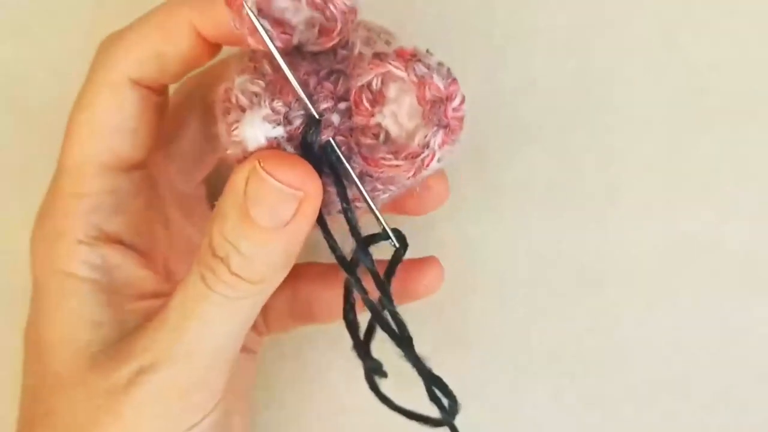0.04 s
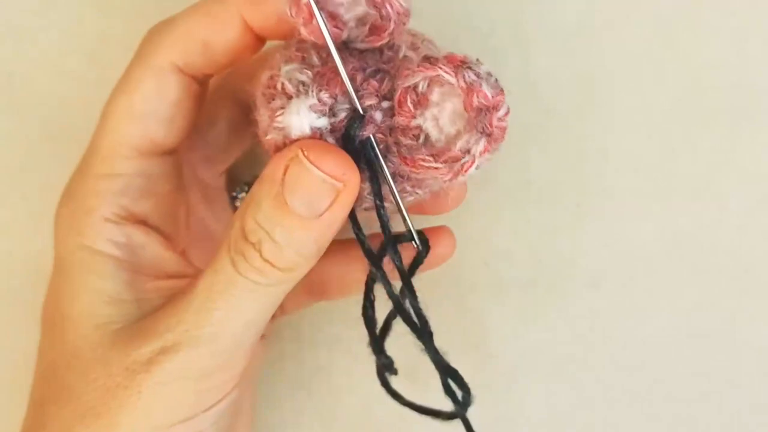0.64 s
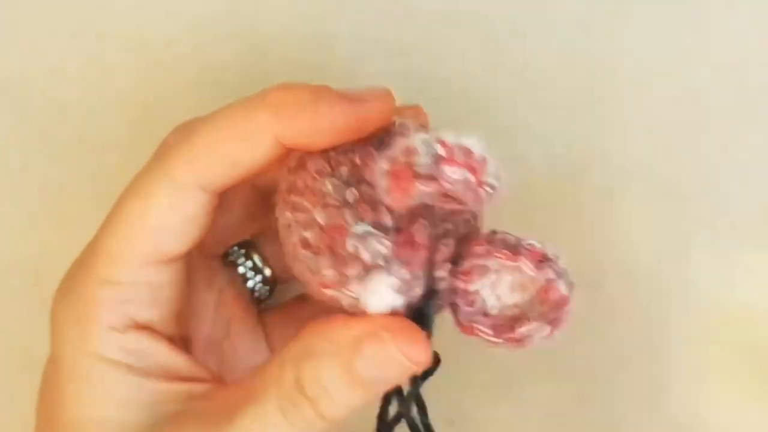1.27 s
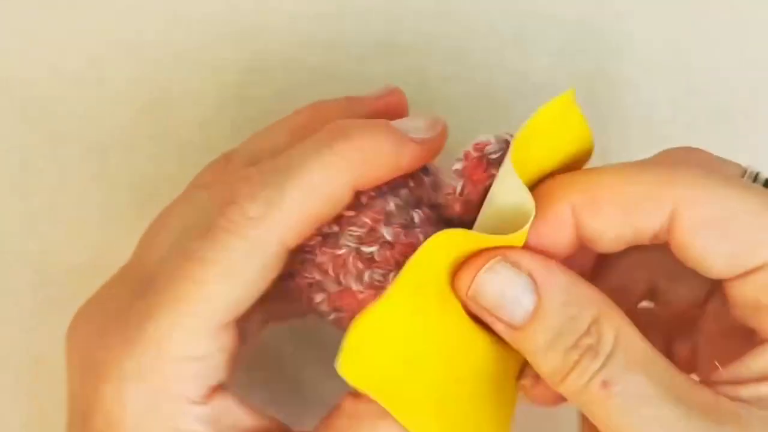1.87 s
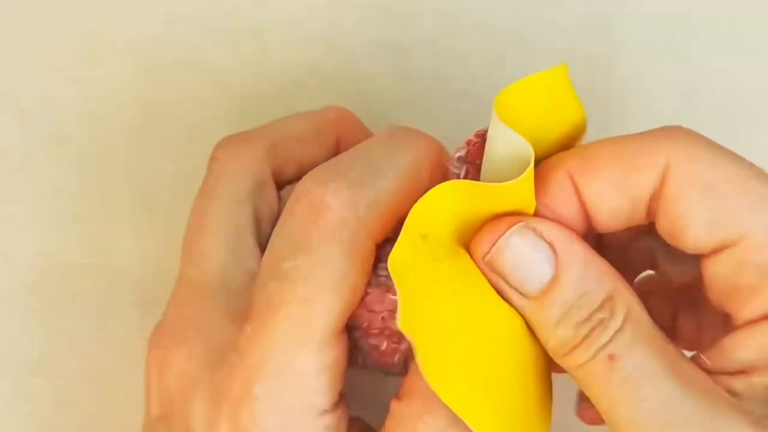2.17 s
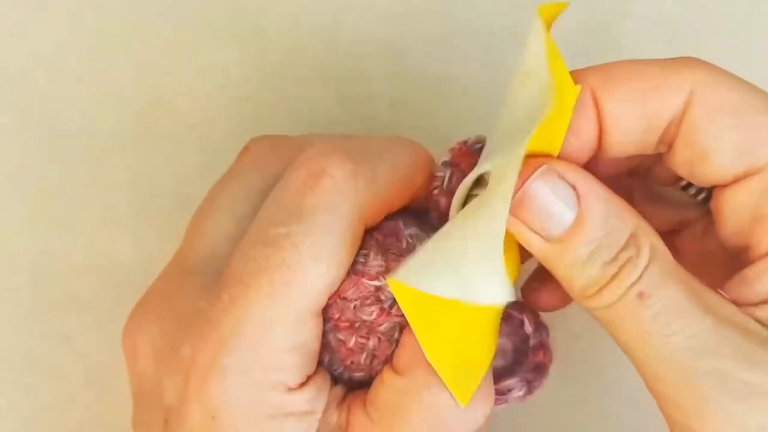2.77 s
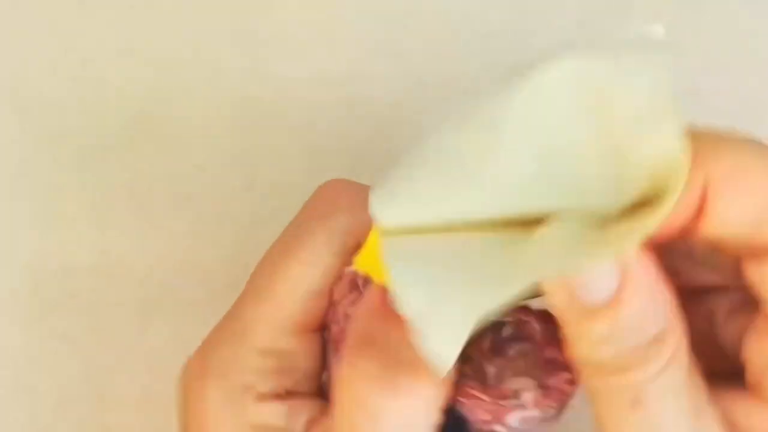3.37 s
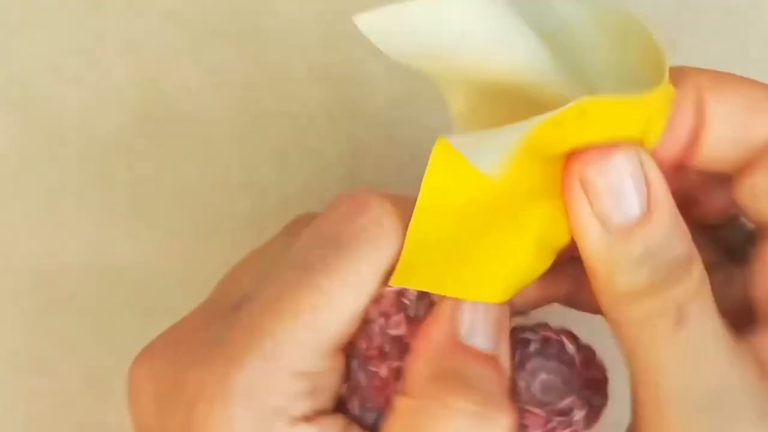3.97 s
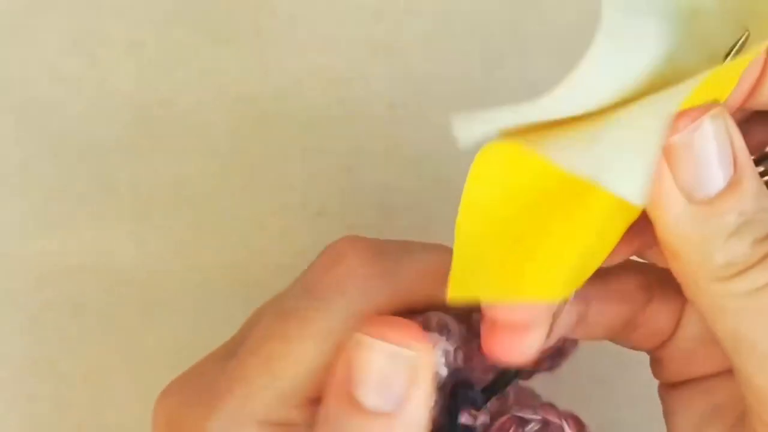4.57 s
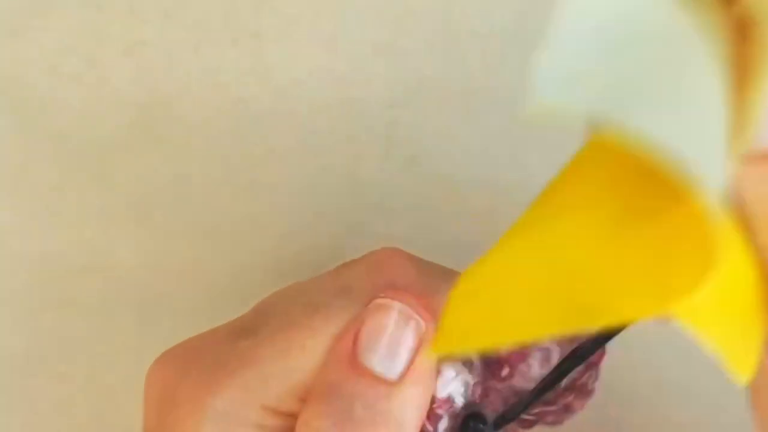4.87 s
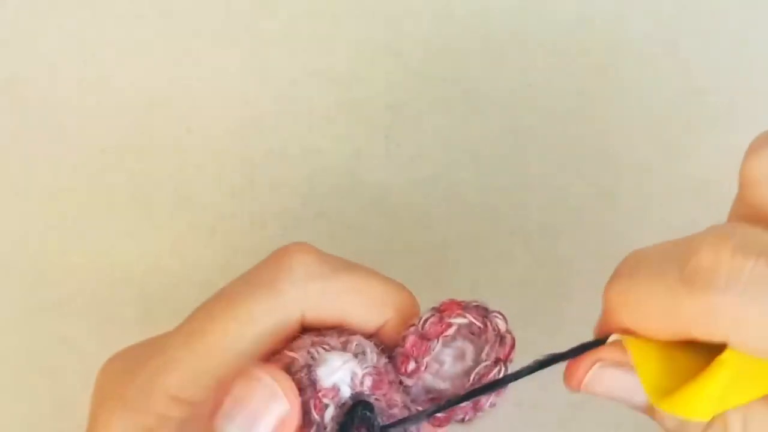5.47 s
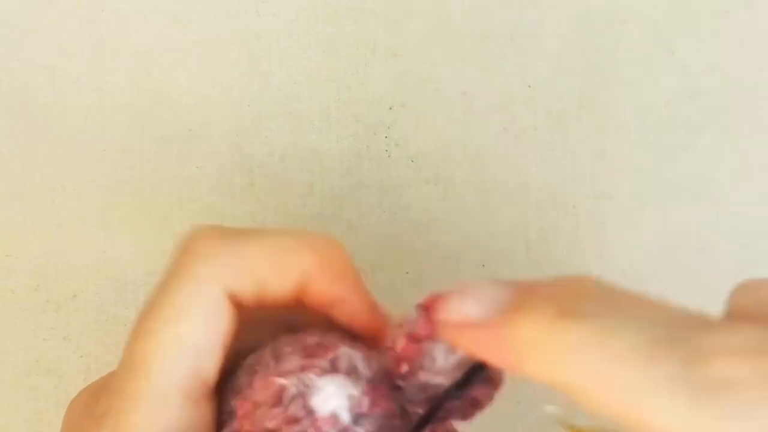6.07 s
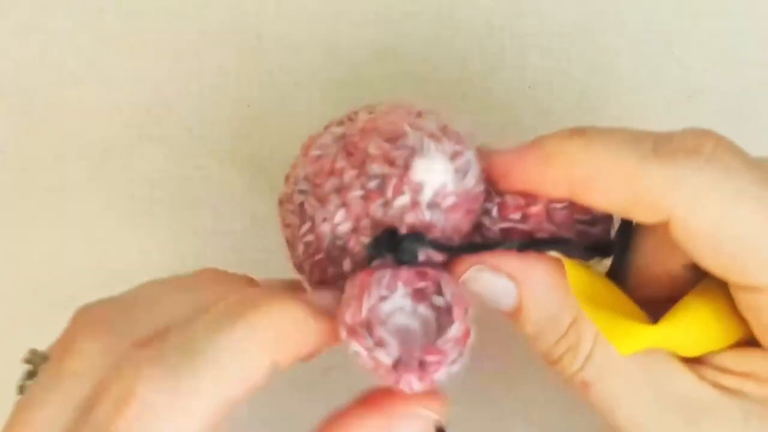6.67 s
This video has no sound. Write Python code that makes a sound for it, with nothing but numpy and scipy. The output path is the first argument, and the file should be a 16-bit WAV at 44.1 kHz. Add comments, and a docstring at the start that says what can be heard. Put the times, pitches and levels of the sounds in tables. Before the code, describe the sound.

Yarn rustles and faintly squeaks as it is drawn through a crocheted toy. Something hard clacks on the table, bounces and skids, ringing briefly around the room. Then a rubber grip rubs on the needle in short scrapes with small dry clicks, and fingers softly bump the stuffed toy now and then. It is all close to a stereo microphone in a bare room with a low hum.

```python
"""Needlework on a crocheted toy

Hands work close to a stereo microphone in a bare, humming room. Yarn rustles and squeaks as it is drawn
through the stitches. Something hard, perhaps a tool, clacks on the table, bounces and rings round
the room. Then a rubber grip rubs on the needle, which slips through in small clicks and scrapes,
and now and then the fingers bump the stuffed toy."""
import sys
import numpy as np
from scipy import signal
from scipy.fft import rfft, irfft, next_fast_len
from scipy.io import wavfile
from scipy.ndimage import uniform_filter1d

SR = 44100
rng = np.random.default_rng(int(sys.argv[2]) if len(sys.argv) > 2 else 0)


def pcm_store(signal):
    """Save signal as 16-bit PCM."""
    levels = np.round(np.clip(np.atleast_2d(signal), -1, 1) * 32767)
    wavfile.write(sys.argv[1], SR, levels.astype(np.int16).T)


N = 297234
TIME = np.arange(N) / SR


def amp(db):
    """Decibels to gain."""
    return 10 ** (np.asarray(db) / 20)


def unit(x):
    """Scales to rms 1."""
    return x / np.sqrt(np.mean(x ** 2) + 1e-20)


def read(points, hz):
    """Reads a table on a log-frequency axis."""
    freqs, values = np.transpose(points)
    return np.interp(np.log(hz + 1), np.log(freqs), values)


def add(mix, start_s, sound):
    """Mixes a stereo sound in at its start time."""
    part = mix[:, round(start_s * SR):][:, :sound.shape[1]]
    part += sound[:, :part.shape[1]]


def tint(x, colour, size=4096):
    """Minimum-phase filter with the given spectrum."""
    log_gain = np.log(amp(read(colour, abs(np.fft.fftfreq(size, 1 / SR)))))
    taps = np.fft.ifft(np.exp(np.conj(signal.hilbert(log_gain)))).real[:size // 2]
    return signal.oaconvolve(x, taps[None], axes=1)[:, :x.shape[1]]


def split(x, hz=2100):
    """Treble and body of a sound."""
    return [signal.sosfilt(signal.butter(4, hz, kind, fs=SR, output="sos"), x)
            for kind in ("high", "low")]


def panned(x, side_db):
    """Tips a sound to the left (+) or the right (-)."""
    return x * amp(np.array([[side_db], [-side_db]]) / 2)


def pair(x, likeness=None):
    """The microphone's two ports hear a close source alike in the bass, differently in the treble."""
    # Each row: frequency in Hz, likeness of the channels from 0 to 1.
    close_likeness = [(130, 0.99), (280, 1), (600, 0.5), (1500, 0.1), (8000, 0)]
    hz = np.fft.rfftfreq(x.shape[1], 1 / SR)
    angle = np.arcsin(read(close_likeness if likeness is None else likeness, hz)) / 2
    spectrum = rfft(x)
    return irfft(np.cos(angle) * spectrum + np.sin(angle) * spectrum[::-1], x.shape[1])


def band(hz, width_hz, order=2):
    """Noise in a narrow resonance that may move."""
    low_pass = signal.butter(order, width_hz / 2, fs=SR, output="sos")
    drift = signal.sosfilt(low_pass, rng.standard_normal((2, N)) + 1j * rng.standard_normal((2, N)))
    carrier = np.exp(2j * np.pi * np.cumsum(hz * np.ones(N)) / SR)
    return unit(pair((drift * carrier).real))


def room(x, build_s=0.0046, size=256):
    """Diffuse echoes off the bare walls build up and die, each band at its own speed."""
    # Each row: frequency in Hz, seconds to fall 60 dB.
    decay_times = [(120, 0.88), (500, 0.47), (1200, 0.71), (4000, 0.5), (7500, 0.51), (14000, 0.49)]
    hz, t, noise = signal.stft(pair(rng.standard_normal((2, SR))), SR, nperseg=size)
    decay = amp(-60 * t / read(decay_times, hz)[:, None])
    _, tail = signal.istft(noise * decay, SR, nperseg=size)
    tail *= 1 - np.exp(-np.arange(tail.shape[1]) / SR / build_s)
    return signal.fftconvolve(x.mean(0)[None], tail / np.linalg.norm(tail[0]), axes=1)[:, :N]


def air():
    """Room tone: a soft, low rush from all round the microphone."""
    # Each row: frequency in Hz, relative level in dB.
    colour = [(25, -25.5), (45, -17.5), (75, -0.5), (230, 2), (420, -7), (800, -10.5), (1500, -17),
              (2600, -22), (4300, -21), (5400, -29), (7000, -18.5), (9000, -29), (15500, -26.5)]
    # Each row: frequency in Hz, likeness of the channels from 0 to 1.
    likeness = [(40, 0.27), (130, 0.4), (280, 0.6), (600, 0.26), (1500, 0), (8000, 0.0082)]
    rush = tint(pair(rng.standard_normal((2, N)), likeness), colour)
    return panned(amp(-57) * unit(rush), side_db=1.17)


def waver(hz, width_hz, unevenness=0.82):
    """A tone whose pitch and strength wander by chance."""
    analytic = signal.hilbert(band(hz, width_hz, order=6)[0], next_fast_len(N))[:N]
    return unit(abs(analytic) ** unevenness * np.cos(np.angle(analytic)))


def hum(throb_hz=2.38, throb_db=3.0, crest_s=1.197):
    """A throbbing hum, perhaps of a fan, over a weaker, lower tone; the same in both ports."""
    # Each row: pitch in Hz, width in Hz, level in dB before the throb.
    tones = [(195.4, 9.9, -58.5), (136.7, 4, -72)]
    main, lower = (amp(db) * waver(hz, width_hz) for hz, width_hz, db in tones)
    throb = amp(throb_db * np.cos(2 * np.pi * throb_hz * (TIME - crest_s)))
    return main * throb + lower


def friction(snaps_per_s, spread_db, smooth):
    """Surfaces catch and let go: tiny snaps of uneven size over a smooth hiss."""
    sizes = amp(spread_db * np.minimum(rng.exponential(1, N), 4))
    snaps = sizes * (rng.random(N) < snaps_per_s / SR) * rng.standard_normal((2, N))
    return pair(unit(snaps) + smooth * rng.standard_normal((2, N)))


def stroke(start_s, length_s, peak_share=0.377, flank_power=0.41):
    """Speed of one stroke of the hand: a lopsided arch from rest to rest."""
    angle = np.interp((TIME - start_s) / length_s, [0, peak_share, 1], [0, np.pi / 2, np.pi])
    return np.sin(angle) ** flank_power


def judder(cutoff_hz=70, depth_db=1.5):
    """Uneven gain of a surface that sticks and slips."""
    wobble = signal.sosfilt(signal.butter(2, cutoff_hz, fs=SR, output="sos"), rng.standard_normal(N))
    return unit(amp(depth_db * unit(wobble)))


def rub(strokes, grain, hiss_db, body_db):
    """Friction under the fingers: light strokes hiss, pressed strokes add body."""
    hiss, body = (unit(part) for part in split(grain))
    speeds = np.array([stroke(start_s, length_s) for start_s, length_s, *_ in strokes])
    hiss_gain, body_gain = amp(np.array(strokes)[:, 2:] + [hiss_db, body_db]).T @ speeds
    return (hiss * hiss_gain + body * body_gain) * judder()


def yarn():
    """Fibres rustle through the stitches, a little to the right: two light draws, then a double tug."""
    # Each row: start and length in seconds, hiss and body in relative dB.
    pulls = [(0, 0.23, -60.5, -57.5), (0.2, 0.42, -56, -53.5), (0.495, 0.23, -45.5, -53.5),
             (0.58, 0.065, -49.5, -58)]
    # Each row: frequency in Hz, relative level in dB.
    colour = [(30, -20.5), (30, -16.5), (250, 2.5), (1400, -12), (2000, -10), (4000, 3), (5700, -4),
              (7200, 3), (9000, -13.5), (15500, -12.5)]
    grain = tint(friction(snaps_per_s=7900, spread_db=2.0, smooth=0.88), colour)
    return panned(rub(pulls, grain, hiss_db=-3.0, body_db=-5.0), side_db=-2.0)


def squeaks():
    """Taut yarn and rubber sing in narrow bands that hold, then slide, as loud as the stroke is fast."""
    # Each row: start and length in seconds, first pitch, last pitch and width in Hz, relative dB.
    glides = [(0.02, 0.32, 2217, 2050, 220, -62.5), (0.06, 0.3, 3500, 3400, 420, -62),
              (0.094, 0.4, 4640, 4700, 450, -64.5), (0.173, 0.37, 6900, 7200, 940, -58.5),
              (0.46, 0.277, 810, 920, 100.9, -59), (0.45, 0.29, 1390, 1500, 185, -59),
              (0.5, 0.163, 3750, 3560, 1111, -56), (1.456, 0.13, 1800, 1300, 432, -63),
              (1.46, 0.22, 4570, 4600, 400, -71), (4.905, 0.059, 2600, 2700, 900, -59),
              (5.987, 0.043, 3750, 3600, 910, -59), (5.418, 0.48, 1513, 1446, 298, -70)]
    out = np.zeros((2, N))
    for start_s, length_s, first_hz, last_hz, width_hz, db in glides:
        progress = np.clip((TIME - start_s) / length_s, 0, 1)
        hz = first_hz + (last_hz - first_hz) * progress ** 2
        out += amp(db) * band(hz, width_hz) * stroke(start_s, length_s) * judder()
    return panned(out, side_db=-2.5)


def pulse(lag_s=0, size=4096):
    """One clean impulse at both ports; it may reach the left one later."""
    t = np.arange(size) / SR
    return np.sinc((t - np.array([[lag_s], [0]])) * SR)


def contact(rasp_db, scatter_s, rise_s, lag_s=0, size=4096):
    """One sharp contact, then a rasping scatter that builds and fades."""
    t = np.arange(size) / SR
    envelope = (1 - np.exp(-t / rise_s)) * np.exp(-t / scatter_s)
    scatter = unit(rng.standard_normal((2, size)) * envelope) / np.sqrt(size)
    return pulse(lag_s) + amp(rasp_db) * pair(scatter)


def blows(rows, sounds, treble_db, body_db):
    """Places each blow with its own share of treble and body; the body leans less to the side."""
    out = np.zeros((2, N))
    for (start_s, high_db, low_db, side_db, *_), sound in zip(rows, sounds):
        for part, db, lean in zip(split(sound), (high_db + treble_db, low_db + body_db), (1, 0.3)):
            power = uniform_filter1d((part ** 2).mean(0), 128, mode="constant")
            add(out, start_s, panned(amp(db) * part / np.sqrt(power.max()), lean * side_db))
    return out


def table_echo(x, left_s=0.0013, right_s=0.0016, echo_db=-8):
    """Adds the first echo, off the table top under the hands."""
    hz = np.fft.rfftfreq(x.shape[1], 1 / SR)
    delay = np.exp(-2j * np.pi * np.outer([left_s, right_s], hz))
    return x + amp(echo_db) * irfft(rfft(x) * delay)


def hollow(x, hz, lift_db):
    """The cupped fingers lift one resonance."""
    return x + (amp(lift_db) - 1) * signal.lfilter(*signal.iirpeak(hz, Q=4.0, fs=SR), x)


def needle():
    """Dry little snaps close to the microphone as needle, grip and fingernails slip."""
    # Each row: start in seconds, snap and body in relative dB, leftward lean in dB,
    # hollow resonance in Hz, its lift in dB, rasp in dB.
    slips = [(0.529, -43.5, -64.5, -5, 12500, 11, 6), (0.5847, -32.5, -56, -3, 4640, 3.5, 13),
             (1.367, -79, -56.5, -10, 970, 6, -3), (2.3275, -44, -43, 3, 744, 5.5, -2),
             (2.3865, -47, -50, 5, 3110, 13, -4), (2.396, -48, -50.5, -3, 2444, 13, 1),
             (2.648, -32, -50.5, -3, 2160, 11.5, -2.5), (2.6918, -39.5, -54, -5, 8100, 4, 3),
             (2.8998, -59, -50, 1, 3700, 9, -5), (2.9072, -53, -50.5, -3, 4200, 15, -7),
             (2.9138, -56, -49.5, 3, 4260, 18, 0), (4.339, -47, -54.5, -2, 354, 17, 12),
             (5.0831, -38, -70, -4, 6850, 13.5, 6), (5.1696, -58, -57.5, 0, 3170, 18, -7.5),
             (5.1765, -54.5, -49.5, 1, 3200, 5, 8), (6.361, -48.5, -57.5, 3.5, 1100, 10, 3)]
    # Each row: frequency in Hz, relative level in dB.
    colour = [(100, -15), (350, 2.5), (800, 7.5), (1500, -4), (2100, -10), (3100, -3), (4400, 0),
              (5500, -8.5), (6600, 2.5), (7600, 2.5), (8600, -2.5), (12500, -10), (16000, -10.5)]
    near, radiated = [], []
    for *_, hz, lift_db, rasp_db in slips:
        snap = table_echo(contact(rasp_db, scatter_s=0.0042, rise_s=0.00037))
        near.append(hollow(tint(snap, colour), hz, lift_db))
        radiated.append(hollow(tint(pulse(), colour), hz, lift_db))
    direct = blows(slips, near, treble_db=-3.0, body_db=4.0)
    return direct + room(blows(slips, radiated, treble_db=-11.5, body_db=-3.5))


def ring(x, ring_db, size=4096):
    """A brief, hard ring over a low room boom follows each contact."""
    # Each row: frequency in Hz, relative level in dB, seconds to fall 60 dB.
    modes = [(136.8, 2.5, 0.23), (489, -5, 0.078), (675, 2, 0.09), (778, 0, .11), (1501, 4, 0.047),
             (2940, 11, .022), (3500, 18, 0.012), (3976, 11.5, .012), (4247, 15.5, 0.016),
             (4710, 8.5, 0.018), (7220, 10, .015)]
    t = np.arange(size) / SR
    ringing = sum(amp(db - 60 * t / t60) * np.cos(2 * np.pi * hz * t) for hz, db, t60 in modes)
    return x + amp(ring_db) * signal.oaconvolve(x, ringing[None], axes=1)[:, :x.shape[1]]


def clack():
    """The hard thing lands on the table with a dry crack, bounces and skids; the room booms."""
    # Each row: start in seconds, clack and table thud in relative dB, leftward lean in dB.
    knocks = [(0.7367, -32.5, -45.5, -6), (0.7653, -23, -35, 0), (0.7672, -11.5, -22.5, -4.5),
              (0.7739, -41, -27, 0.5), (0.8445, -22.5, -28.5, -5.5), (0.8488, -22.5, -31.5, 0),
              (0.8843, -35, -36.5, 0), (0.9026, -22, -31.5, -4), (0.9446, -35, -30.5, 0)]
    # Each row: time in seconds, relative level of the skid in dB.
    skid_curve = [(0.77, -59), (0.83, -70), (0.86, -39), (0.93, -50), (0.969, -48.5), (1.029, -57),
                  (1.122, -78)]
    # Each row: frequency in Hz, relative level in dB.
    colour = [(30, -48.5), (125, -15), (220, -15), (350, -9), (600, -12), (1000, -11), (1350, -17.5),
              (2400, -15.5), (3050, -13.5), (3400, -5.5), (4600, -6.5), (5100, -14), (5800, -17),
              (7100, -13), (8300, -20), (10000, -37), (12500, -24.5), (15500, -30.5)]
    cracks = [contact(rasp_db=2.0, scatter_s=0.0028, rise_s=0.0013, lag_s=0.00026) for _ in knocks]
    near = [tint(ring(crack, ring_db=-47.0), colour) for crack in cracks]
    direct = blows(knocks, near, treble_db=-3.0, body_db=-2.1)
    boom = tint(ring(pulse(), ring_db=-54.5), colour)
    radiated = blows(knocks, [boom] * len(knocks), treble_db=-4.5, body_db=0.5)
    scrape = unit(tint(friction(snaps_per_s=950, spread_db=2.5, smooth=0.4), colour))
    skid = scrape * amp(np.interp(TIME, *np.transpose(skid_curve), left=-140, right=-140))
    return direct + room(radiated + skid) + amp(-5.5) * skid


def grip():
    """The rubber grip scrapes over needle and yarn in short strokes, a little to the left."""
    # Each row: start and length in seconds, hiss and body in relative dB.
    strokes = [(1.36, 0.12, -58, -59), (1.48, 0.18, -66.5, -59), (1.65, 0.089, -59.5, -65),
               (1.75, 0.12, -63.5, -63), (1.85, 0.11, -59.5, -70.5), (2.32, 0.092, -51, -64.5),
               (2.638, 0.042, -52, -58), (2.8, 0.092, -60.5, -84), (4.335, 0.08, -49, -72),
               (4.618, 0.033, -56, -74), (4.695, 0.093, -58, -61), (4.855, 0.25, -56, -74),
               (4.9, 0.062, -56, -63), (5.095, 0.055, -50.5, -71.5), (5.32, 0.45, -63.5, -64.5),
               (6.1, 0.35, -65, -63)]
    # Each row: frequency in Hz, relative level in dB.
    colour = [(200, -3), (650, 5), (1400, 3.5), (2600, 1.5), (4200, 6.5), (5500, 2.5), (7000, 11),
              (9000, -2.5), (15500, -2)]
    grain = tint(friction(snaps_per_s=2600, spread_db=1.2, smooth=0.98), colour)
    return panned(rub(strokes, grain, hiss_db=-1.2, body_db=-4.5), side_db=1.5)


def bumps(swell_s=0.0031, size=2048):
    """Fingers bump the stuffed toy, dead centre: a few soft, low cycles that swell and die."""
    # Each row: start in seconds, pitch in Hz, level in dB.
    touches = [(1.4671, 287, -38), (6.2, 164, -44.5), (6.236, 149, -43.5)]
    t = np.arange(size) / SR
    envelope = t / swell_s * np.exp(1 - t / swell_s)
    out = np.zeros((2, N))
    for start_s, hz, db in touches:
        thump = amp(db) * envelope * np.cos(2 * np.pi * hz * t)
        add(out, start_s, np.array([thump, thump]))
    return out


def scene():
    """The close handwork and the room behind it, as they reach the microphone."""
    rubbing = yarn() + grip()
    return rubbing + squeaks() + air() + hum() + amp(-6.0) * room(rubbing) + clack() + needle() + bumps()


def record(dry, edge_hz=15700):
    """The sound has a deep dip near 9-11 kHz and a steep treble cut-off."""
    # Each row: frequency in Hz, gain in dB.
    treble_dip = [(8300, 0), (9000, -10), (10000, -9), (11250, -23.5), (11650, 0.5)]
    coloured = irfft(rfft(dry) * amp(read(treble_dip, np.fft.rfftfreq(N, 1 / SR))), N)
    low_pass = signal.firwin(511, edge_hz, window=("kaiser", 9), fs=SR)
    return signal.oaconvolve(coloured, low_pass[None], "same", axes=1)


dry = scene()
out = record(dry)
pcm_store(out)
```